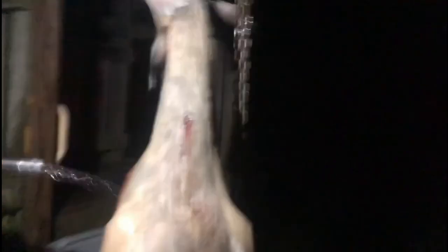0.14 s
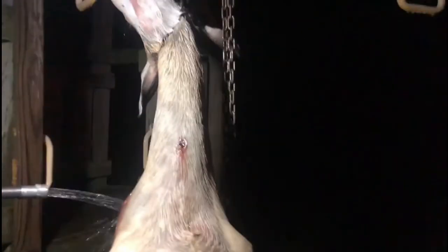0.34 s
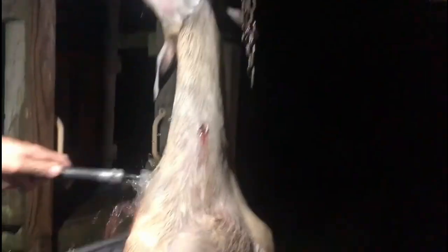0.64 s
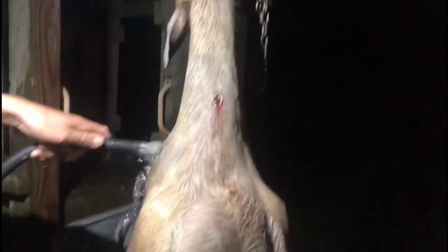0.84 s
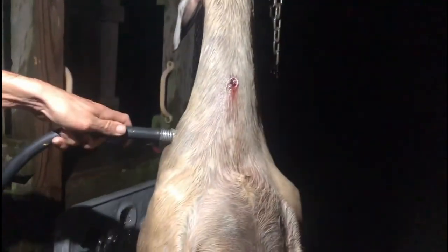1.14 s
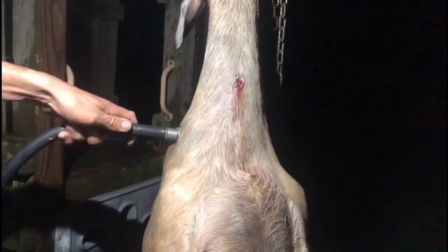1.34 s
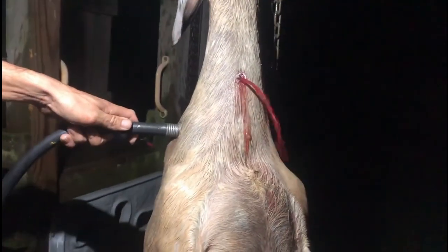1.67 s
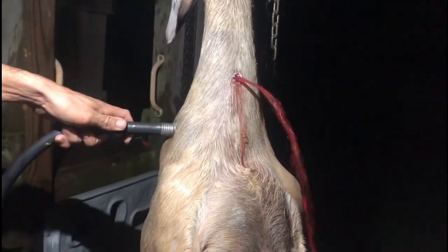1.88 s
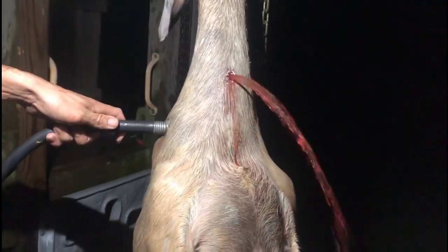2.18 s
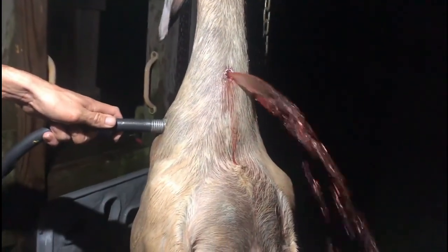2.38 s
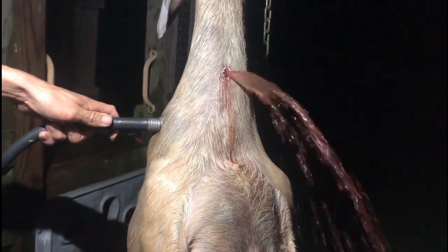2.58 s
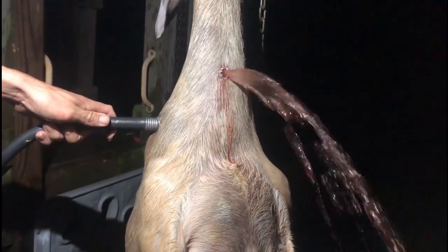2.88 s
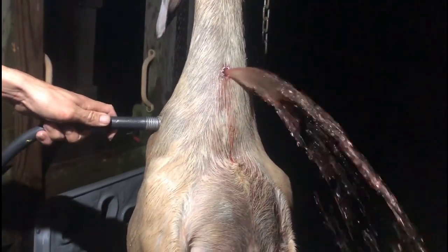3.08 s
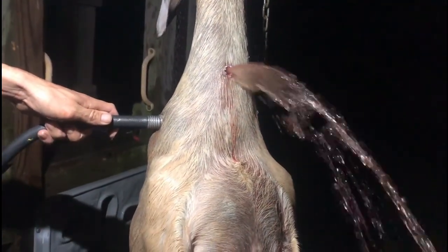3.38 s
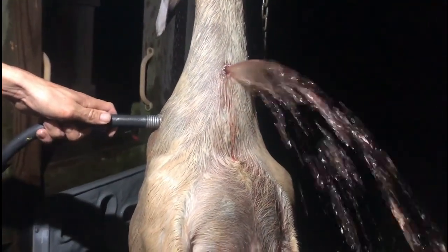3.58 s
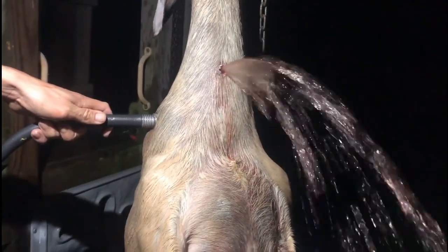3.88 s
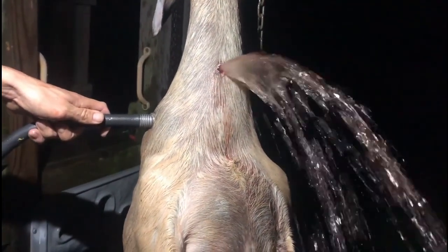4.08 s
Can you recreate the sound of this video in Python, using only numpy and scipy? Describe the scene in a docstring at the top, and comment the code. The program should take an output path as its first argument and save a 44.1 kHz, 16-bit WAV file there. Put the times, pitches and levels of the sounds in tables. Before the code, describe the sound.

Close hose spray splashes on a hanging carcass, gurgles and fades, followed by a thin stream pattering down over constant hiss, left channel only.

```python
"""Hose on a hanging carcass

Outdoors, close to the water: a jet spatters on wet hide as bursts of short damped sines, low and bright.
The nozzle goes in with two clear gulps and a faint echo, swelling low notes, and the splashing dies away.
Then water spills out of a hole and patters on the ground, again as damped sines.
The hose hisses throughout (filtered noise) over a low rumble; only the left channel carries sound."""
import sys
import numpy as np
from scipy import signal
from scipy.fft import rfft, irfft, next_fast_len
from scipy.io import wavfile
from scipy.ndimage import map_coordinates

SR = 44100
rng = np.random.default_rng(int(sys.argv[2]) if len(sys.argv) > 2 else 0)


def store_pcm(level_fs):
    """Save levels as 16-bit WAV."""
    pcm = np.round(np.clip(level_fs, -1, 1) * 32767).astype(np.int16)
    wavfile.write(sys.argv[1], SR, np.atleast_2d(pcm).T)


N = 186177
TIME = np.arange(N) / SR

# All levels in dB are relative settings inside the mix, ahead of the doubling in scene().
# Outdoor rumble, spectrum. Each row: frequency in Hz, level in dB.
RUMBLE_SPECTRUM = [(20, -32), (35, -48), (50, -10), (70, -6.5), (100, -9.5), (150, -18), (300, -35.5)]
# Brief swells of the rumble. Each row: time in seconds, rise in dB.
RUMBLE_SWELLS = [(0.2, 3), (0.37, 6), (0.53, 6), (2.35, 5), (2.51, 12)]
# Water churning inside the body, spectrum. Each row: frequency in Hz, level in dB.
CHURN_SPECTRUM = [(80, -32), (125, -2.5), (165, -0.5), (225, -10), (310, -5), (420, -16), (700, -23.5),
                  (1500, -70)]
# Broad hiss of the hose, spectrum. Each row: frequency in Hz, level in dB.
HISS_SPECTRUM = [(150, -3), (600, -8.5), (1050, 2), (1400, -22), (2200, 3.5), (4000, -0.5), (7000, -1),
                 (11000, -4), (15500, 4.5)]
# Resonances of hose and nozzle. Each row: frequency in Hz, width in Hz, level in dB.
NOZZLE_RESONANCES = [(2190, 41, 6.5), (2833, 144, 0.5), (3627, 45, 3), (4610, 130, -2), (5110, 250, 3)]
# Brief thin whistles. Each row: start in seconds, end in seconds, pitch in Hz, level in dB,
# waver as a share of the pitch.
WHISTLES = [(0.33, 0.85, 4400, -53, 0.028), (2.658, 3.07, 4368, -58.5, 0.008)]
# Air gulped as the nozzle goes in: two gulps and a faint echo.
# Each row: loudest moment in seconds, level in dB, pitch in Hz.
GULPS = [(1.0475, -41, 360), (1.0797, -40.5, 390), (1.093, -55, 370)]
# Single bubbles that ring in the wet. Each row: start in seconds, level in dB, pitch in Hz.
LONE_BUBBLES = [(0.292, -40, 3400), (1.247, -37, 3120), (1.2493, -31.5, 1990), (1.84, -46, 2610),
                (2.192, -49.5, 2830), (2.2993, -38, 4330), (2.896, -36, 9500), (3.0522, -42, 3170),
                (3.1533, -44, 3100), (3.635, -41, 3920), (3.6345, -46, 2840), (3.8157, -43.5, 2620),
                (3.864, -42, 2620), (4.0247, -47, 1540), (4.12, -42.5, 2080)]
# Sputters of fine droplets, beside the nozzle and then on the ground.
# Each row: start in seconds, level in dB, pitch in Hz.
SPURTS = [(0.11, -40, 6450), (0.719, -29.5, 10570), (0.987, -30, 8800), (1.027, -35, 5500),
          (1.071, -47, 12000), (1.094, -36, 8100), (1.129, -37, 7200), (1.136, -31.5, 10900),
          (1.155, -38, 6800), (1.196, -35, 6450), (1.2786, -32, 8150), (1.2965, -35, 8800),
          (1.3169, -32, 8800), (1.3605, -36.5, 5950), (1.4962, -37, 7300), (1.5167, -33.5, 11900),
          (1.5318, -34, 9100), (1.583, -39, 6700), (1.629, -39, 7650), (1.698, -37.5, 5800),
          (1.74, -39.5, 4800), (1.908, -39, 6600), (1.917, -39, 7500), (1.961, -40, 7960),
          (2.019, -39.5, 11000), (2.192, -44, 5170), (2.224, -42, 10000), (2.262, -40, 11200),
          (2.278, -44, 6000), (2.2982, -41.5, 5000), (2.361, -45, 7050), (2.369, -40.5, 8600),
          (2.439, -41, 5300), (2.533, -39.5, 7940), (2.559, -38.5, 7000), (2.6375, -39, 7300),
          (2.6785, -39, 7300), (2.768, -42, 7000), (2.841, -39.5, 5400), (2.9605, -37.5, 6040),
          (2.9812, -43, 7400), (3.004, -40, 6100), (3.049, -39.5, 6570), (3.1523, -39, 5140),
          (3.203, -39.5, 7200), (3.3015, -38.5, 6100), (3.366, -37, 6600), (3.433, -45.5, 6900),
          (3.453, -43, 7100), (3.479, -41, 6560), (3.6175, -38.5, 7500), (3.668, -39.5, 8400),
          (3.724, -38, 13400), (3.831, -38, 5400), (3.843, -39, 8100), (3.863, -33.5, 6400),
          (3.8795, -38, 9300), (3.89, -43, 5550), (3.9, -41.5, 6460), (3.9145, -38, 8400),
          (4.0046, -40, 9000), (4.069, -41, 12000), (4.154, -42, 8300)]
# Soft thuds of water, on the hide and then on the ground.
# Each row: start in seconds, level in dB, pitch in Hz.
THUDS = [(0.049, -34.5, 1360), (0.07, -40, 1150), (0.201, -35.5, 1320), (0.37, -42.5, 1290),
         (0.445, -34, 1560), (0.65, -40.5, 710), (0.828, -38.5, 1310), (1.07, -38.5, 1400),
         (1.103, -40, 1090), (1.386, -40, 1410), (1.475, -44, 1050), (1.693, -47.5, 1120),
         (1.764, -44, 930), (1.868, -53, 734), (2.456, -46.5, 1100), (3.334, -43, 1260), (3.721, -58, 1090),
         (3.914, -57, 1180)]
# The loudest slaps that trap a pocket of air. Each row: start in seconds, level in dB, pitch in Hz.
SLAPS = [(0.0674, -29, 3170), (0.069, -32, 2000), (0.083, -56, 1720), (0.11, -29.5, 2550),
         (0.1144, -36, 2010), (0.116, -29, 3320), (0.1247, -34, 2000), (0.125, -34, 2880),
         (0.159, -29, 3340), (0.199, -37, 2030), (0.2117, -29.5, 2380), (0.213, -45, 1650),
         (0.2479, -30.5, 1780), (0.284, -35, 2070), (0.3372, -42, 1310), (0.3702, -35, 1530),
         (0.381, -35, 1460), (0.394, -32.5, 2600), (0.3957, -30.5, 1900), (0.42, -30.5, 1820),
         (0.4184, -29, 2560), (0.45, -29, 2460), (0.519, -35, 1900), (0.535, -31, 1810),
         (0.606, -39.5, 1530), (0.641, -34, 2500), (0.652, -36, 1610), (0.704, -39, 2100),
         (0.948, -35, 1990), (1.041, -35, 1960), (1.052, -34.5, 2160), (1.07, -33, 2030),
         (1.105, -33, 2070), (1.127, -31, 2200), (1.1623, -35, 1960), (1.169, -33.5, 2450),
         (1.221, -35.5, 2240), (1.2461, -39, 3100), (1.2477, -43, 2110), (1.278, -38, 2050),
         (1.289, -28.5, 2220), (1.3174, -36, 2200), (1.331, -37, 2240), (1.3806, -30.5, 2090),
         (1.391, -34.5, 2220), (1.404, -41, 1920), (1.5173, -34.5, 2940), (1.629, -31, 3300),
         (1.697, -31.5, 3300), (1.712, -41, 2150), (1.84, -41, 2240), (1.7594, -44, 2120),
         (1.768, -37, 1980), (1.863, -37, 1960), (2.2684, -42, 1680), (2.277, -42.5, 1770),
         (2.438, -41, 2590), (2.4555, -37.5, 1570), (2.7315, -38.5, 2300), (2.839, -42, 1680),
         (2.9976, -37.5, 2150), (3.1516, -36.5, 3110), (3.335, -43, 2020), (3.4765, -43.5, 2430),
         (3.5733, -51, 1710), (3.5825, -43, 2200), (3.722, -39, 2200), (3.829, -37.5, 3470),
         (3.8905, -36, 3300), (3.914, -35, 2070), (3.914, -34, 1570)]
# The heaviest drops. Each row: start in seconds, level in dB, pitch in Hz.
HEAVY_DROPS = [(0.109, -31, 6100), (0.134, -21, 7100), (0.3952, -25, 6500), (0.5931, -23.5, 6260),
               (0.683, -20, 6140), (0.6886, -20, 6300), (0.9473, -15.5, 6600), (1.005, -25, 5240),
               (1.037, -29, 5400), (1.0701, -22, 5300), (1.137, -24, 6800), (1.2895, -16.5, 8500),
               (1.3309, -14.5, 7800), (1.5507, -26, 9290), (1.629, -21.5, 7550), (1.79, -33, 11000),
               (1.8775, -20.5, 9600), (1.893, -20, 10600), (2.5206, -27.5, 6400), (2.6513, -21, 7500),
               (2.7385, -21, 7150), (2.895, -31, 9260), (2.9622, -24, 6640), (3.0863, -19, 6170),
               (3.3634, -31, 6300), (3.4532, -29, 7330), (3.5737, -20.5, 8400), (3.6945, -19, 7400),
               (3.7478, -27, 6450), (4.0847, -26, 9500)]
# Fine patter on the ground, spectrum. Each row: frequency in Hz, level in dB.
GROUND_SPECTRUM = [(240, -48), (400, -11.5), (1160, -8.5), (1420, -9.5), (1560, -8), (1790, -5.5),
                   (2220, -0.5), (2840, -35), (3070, -2), (3870, -6.5), (6150, 1), (11400, -4), (15300, 1),
                   (16000, -18)]
# Fine spray on the hide, spectrum. Each row: frequency in Hz, level in dB.
HIDE_SPECTRUM = [(290, -13.5), (500, -14), (795, -25), (974, -20), (1600, -20), (1950, -1), (2500, -3.5),
                 (2730, -6), (3340, -0.5), (4090, -4.5), (7000, -2), (12100, -5.5), (15100, 0),
                 (16000, -20)]

SOUND_ON_S = 0.0478  # silence before this
TOP_HZ = 15950  # band limit
# background: a rumble that swells briefly, and churning that grows as the body fills
RUMBLE_DB, SWELL_WIDTH_S = -65.5, 0.026
CHURN_DB, CHURN_FULL_DB = -67, -62.5
HISS_DB, NOZZLE_DB = -54.0, -61.5
WHISTLE_RISE_S, WHISTLE_FLUTTER_DB = .008, 5
# gulps: the pitch sags as the bubble swells; the rasp is the share of rough sloshing
GULP_WIDTH_S, GULP_SAG_PER_S, GULP_RASP = 0.0036, 39, 0.39
BUBBLE_CYCLES = 5.5  # decay time of a lone bubble in cycles
BUBBLE_GLIDE = 0.0045  # a bubble's rise in pitch over its decay time, as a share
# a slap's pop and splutter against its table level; spread of the splutter's pitches (log units)
POP_DB, SPLUTTER_DB, SPLUTTER_SPREAD = -4.5, -10.5, 0.22
FIZZ_DB, FIZZ_GROWS = -22.5, 0.71  # fragments of a 0 dB drop; dB gained per dB of the drop
# the flow of jet and spill is slightly uneven
SURGE_DB, SURGES_PER_S = -0.07, 8.22
# the overflow starts to land, then grows with the flow
SPILL_S, SPILL_RISE_S = 1.985, 0.33
SPILL_DB, SPILL_GROWS_DB_PER_S = -53.5, 1.34
# slapping, soft low plashing, crisp ticks and ringing bubbles on the ground, against the fine patter
PUDDLE_DB, PLASH_DB, TICK_DB, TINKLE_DB = -13, -19.5, -13.5, -14
# the jet on the hide: steady spray until the nozzle seals, then it dies away and stops
SPRAY_DB, SEAL_S, SPRAY_FADE_DB_PER_S = -44, 1.027, 9
SPRAY_STOP_S = (1.9, 2.06)  # (start, end)
# its slapping weakens once the nozzle starts to close in
SLAP_DB, APPROACH_S, SLAP_FADE_DB_PER_S = -54, 0.68, 12.5
FROTH_DB = -6.5  # bubbles in the film on the hide, against the slapping
# broad splatter of the long jet, against the slapping; (start, end) of its fade as the nozzle closes in
SPLAT_DB, SPLAT_HZ, SPLAT_END_S = -9, 1334, (0.43, 1)
# the half-sealed jet sputters, and gurgles in the pocket around the nozzle
SPUTTER_DB, SPUTTERS_PER_S = 1.9, 53
GURGLE_DB, GURGLE_HZ, GURGLE_FADE_DB_PER_S = -56.5, 2140, 13
GURGLE_RISE_S = (1.1, 1.26)  # (start, end)


def amp(db):
    """Decibels to gain."""
    return 10 ** (np.asarray(db) / 20)


def unit(x):
    """Scale to rms 1."""
    return x / np.sqrt(np.mean(x ** 2) + 1e-20)


def ramp(start, end):
    """Rises from 0 to 1 between two times; a step if they coincide."""
    return np.clip((TIME - start) / max(end - start, 1 / SR), 0, 1)


def since(start):
    """Seconds gone by since a moment, 0 before it."""
    return np.maximum(TIME - start, 0)


def wobble(rate):
    """A smooth random curve, rate knots a second."""
    return map_coordinates(rng.standard_normal(4096), [TIME * rate], mode="wrap")


def filtered(x, response):
    """x times a response of frequency, padded so that its end does not wrap round."""
    m = next_fast_len(N + SR // 2)
    return irfft(rfft(x, m) * response(np.fft.rfftfreq(m, 1 / SR)), m)[..., :N]


def coloured(x, spectrum):
    """x shaped by (Hz, dB) points, at rms 1."""
    f, db = np.transpose(spectrum)
    return unit(filtered(x, lambda hz: amp(np.interp(np.log(hz + 1), np.log(f), db))))


def pings(starts, gains, hz, life, glide=0., size=160):
    """Damped sines laid out in time; life is the decay time in s, glide the rise in pitch per life."""
    t = np.arange(size) / SR
    age = t / life[:, None]
    shape = np.exp(-age) * (1 - np.exp(-5 * age)) / .58  # soft onset, peak near 1
    cycles = hz[:, None] * t * (1 + glide * age / 2)
    waves = gains[:, None] * shape * np.sin(2 * np.pi * cycles)
    where = (starts * SR).astype(int)[:, None] + np.arange(size)
    return np.bincount(where.ravel(), waves.ravel(), N)[:N]


def sizes(starts, size_db, clump_db):
    """Gains for many small drops and a few large ones, louder in clumps as the stream breaks up."""
    large = np.minimum(rng.exponential(size=len(starts)), 3)
    clumps = unit(np.gradient(wobble(110)))
    return amp(size_db * large + clump_db * np.interp(starts, TIME, clumps))


def fragments(starts, gains, hz, scatter, spread, count):
    """Each drop breaks into pieces near its own pitch, weaker the later they land: (starts, gains, Hz)."""
    z = rng.standard_normal((len(starts), 3, count))
    late = (np.arange(count) + .5 + .5 * np.tanh(z[:, 0])) / count  # 0 to 1 over the scatter time
    pieces = gains[:, None] * np.sign(z[:, 1]) * np.exp(-2 * late)
    pitch = np.minimum(hz[:, None] * np.exp(spread * z[:, 2]), SR / 2)
    return (starts[:, None] + scatter * late).ravel(), pieces.ravel(), pitch.ravel()


def spray(spectrum, size_db, clump_db, scatter, count):
    """Droplets of all pitches, each a brief burst of ticks."""
    when, pitch = rng.random((2, count))
    starts = when * TIME[-1]
    drop_gains = sizes(starts, size_db, clump_db)
    drop_hz = SR / 2 * (.01 + .8 * pitch)
    s, gains, hz = fragments(starts, drop_gains, drop_hz, scatter, spread=.2, count=8)
    life = .00008 * 4 ** rng.random(len(s))
    return coloured(pings(s, gains, hz, life, size=56), spectrum)


def slapping(pitch_hz, spread, size_db, count):
    """Blobs of water trap clusters of small air pockets that ring for a few cycles."""
    starts = rng.random(count) * TIME[-1]
    pitch = np.interp(starts, TIME, pitch_hz) * np.exp(spread * rng.standard_normal(count))
    blob_gains = sizes(starts, size_db, clump_db=4.0)
    s, gains, hz = fragments(starts, blob_gains, pitch, scatter=.008, spread=0.06, count=4)
    return unit(pings(s, gains * np.sqrt(hz), hz, 1.13 / hz, size=300))


def bubbling(pitch_hz, spread, cycles, count):
    """A swarm of single bubbles, each ringing at its own pitch."""
    starts = rng.random(count) * TIME[-1]
    hz = pitch_hz * np.exp(spread * rng.standard_normal(count))
    gains = sizes(starts, size_db=6.5, clump_db=2.0)
    return unit(pings(starts, gains, hz, cycles / hz, glide=BUBBLE_GLIDE, size=600))


def ticking(pitch_hz, spread, cycles, range_db, count):
    """Lone droplets land, each one dry tick at its own pitch."""
    when, size = rng.random((2, count))
    hz = np.minimum(pitch_hz * np.exp(spread * rng.standard_normal(count)), SR / 3)
    return unit(pings(when * TIME[-1], amp(range_db * size), hz, cycles / hz))


def rumble():
    """Outdoor rumble: low filtered noise with a few brief swells."""
    swell_db = sum(db * np.exp(-((TIME - s) / SWELL_WIDTH_S) ** 2) for s, db in RUMBLE_SWELLS)
    return amp(RUMBLE_DB + swell_db) * coloured(rng.standard_normal(N), RUMBLE_SPECTRUM)


def churn():
    """Water churns as the body fills: low filtered noise that grows from the start of the spill."""
    churn_db = CHURN_DB + (CHURN_FULL_DB - CHURN_DB) * ramp(SPILL_S, TIME[-1])
    return amp(churn_db) * coloured(rng.standard_normal(N), CHURN_SPECTRUM)


def shed(x, t60):
    """A short scatter off the timber and the ground nearby: decaying noise after a 3 ms gap."""
    t = np.arange(SR // 4) / SR
    tail = rng.standard_normal(len(t)) * amp(-60 * t / t60) * (t > .003)
    return signal.fftconvolve(x, tail / np.linalg.norm(tail))[:N]


def hose():
    """Water hisses through the nozzle: broad noise, and noise through parallel band-pass resonances."""
    def body(f):
        return sum(amp(db) * 1j * f * w / (c * c - f * f + 1j * f * w) for c, w, db in NOZZLE_RESONANCES)

    hiss = amp(HISS_DB) * coloured(rng.standard_normal(N), HISS_SPECTRUM)
    return hiss + amp(NOZZLE_DB) * unit(filtered(rng.standard_normal(N), body))


def whistles():
    """A thin high note starts at once and fades: airy the first time, nearly pure the second."""
    out = np.zeros(N)
    for start, end, hz, db, waver in WHISTLES:
        phase = 2 * np.pi * np.cumsum(hz * (1 + waver * wobble(300))) / SR
        swell = ramp(start, start + WHISTLE_RISE_S) * (1 - ramp(start, end))
        out += amp(db + WHISTLE_FLUTTER_DB * wobble(40)) * swell * np.sin(phase)
    return out


def blips():
    """Lone bubbles ring with a nearly pure note that rises slightly."""
    s, db, hz = np.transpose(LONE_BUBBLES)
    return pings(s, amp(db), hz, BUBBLE_CYCLES / hz, glide=BUBBLE_GLIDE, size=1200)


def spurts():
    """Short sputters: a puff of fine droplets with no single crack."""
    s, db, hz = np.transpose(SPURTS)
    when, gains, pitch = fragments(s, amp(db), hz, scatter=0.005, spread=0.15, count=60)
    return pings(when, gains, pitch, 1.1 / pitch)


def thuds():
    """Thick blobs land dully and hardly ring."""
    s, db, hz = np.transpose(THUDS)
    when, gains, pitch = fragments(s, amp(db), hz, scatter=0.01007, spread=0.12, count=8)
    return pings(when, gains, pitch, 1.1 / pitch, size=600)


def gulps():
    """Big bubbles swell and collapse within a few cycles as the nozzle enters, sagging and sloshing."""
    slosh = coloured(rng.standard_normal(N), [(120, -22), (250, 4), (520, -4), (800, -29)])
    out = np.zeros(N)
    for s, db, hz in GULPS:
        t = TIME - s
        note = np.sin(2 * np.pi * hz * t * (1 - GULP_SAG_PER_S * t / 2))
        tone = np.exp(-(t / GULP_WIDTH_S) ** 2) * note
        rasp = np.exp(-(t / GULP_WIDTH_S / 2) ** 2) * slosh / 2  # half as long as the note
        out += amp(db) * (tone + GULP_RASP * rasp)
    return out


def big_slaps():
    """Larger air pockets pop under the water, each with a splutter of smaller ones."""
    s, db, hz = np.transpose(SLAPS)
    pops = pings(s + 0.00096, amp(db + POP_DB), hz, 3.8 / hz, glide=0.0018, size=1000)
    when, gains, pitch = fragments(s + 0.001005, amp(db + SPLUTTER_DB), hz, scatter=0.008,
                                   spread=SPLUTTER_SPREAD, count=20)
    return pops + pings(when, gains, pitch, 1.9 / pitch, size=600)


def big_drops():
    """Single heavy drops crack, a low tick and a bright one together, and their fragments fizz."""
    s, db, hz = np.transpose(HEAVY_DROPS)
    low_ticks = pings(s + .0012, amp(db - 3), hz, 1.2 / hz)
    bright_ticks = pings(s + .0013, amp(db - 5.5), hz / 2 + 9000, .9 / hz)
    fizz_gains = amp(FIZZ_DB + FIZZ_GROWS * db)
    when, gains, pitch = fragments(s + .0008, fizz_gains, hz, scatter=0.0045, spread=0.14, count=44)
    return low_ticks + bright_ticks + pings(when, gains, pitch, .8 / pitch)


def spill():
    """The overflow falls to the ground and breaks into drops, louder as the stream thickens."""
    flow_db = SPILL_DB + SPILL_GROWS_DB_PER_S * since(SPILL_S) + SURGE_DB * wobble(SURGES_PER_S)
    fine = spray(GROUND_SPECTRUM, size_db=3.0, clump_db=1.7, scatter=.0025, count=3600)
    wet = amp(PUDDLE_DB) * slapping(np.full(N, 2800), spread=0.32, size_db=1.5, count=600)
    plash = amp(PLASH_DB) * slapping(np.full(N, 1000), spread=0.38, size_db=1.0, count=300)
    ticks = amp(TICK_DB) * ticking(4300, spread=0.44, cycles=1.9, range_db=3, count=330)
    tinkle = amp(TINKLE_DB) * bubbling(4780, spread=0.39, cycles=14.0, count=500)
    patter = fine + wet + plash + tinkle + ticks
    return amp(flow_db) * patter * ramp(SPILL_S, SPILL_S + SPILL_RISE_S)


def jet():
    """The jet spatters on the hide until the nozzle is buried; the air pockets shrink as it closes in."""
    spray_db = SPRAY_DB - SPRAY_FADE_DB_PER_S * since(SEAL_S) + SURGE_DB * wobble(SURGES_PER_S)
    sputter = unit(amp(SPUTTER_DB * ramp(*GURGLE_RISE_S) * np.tanh(wobble(SPUTTERS_PER_S))))
    fine = spray(HIDE_SPECTRUM, size_db=2.5, clump_db=2.18, scatter=.0042, count=7000)
    slap_db = SLAP_DB - SLAP_FADE_DB_PER_S * since(APPROACH_S)
    pocket_hz = 1900 + 500 * ramp(APPROACH_S, APPROACH_S)  # smaller pockets ring higher: one step up
    slaps = slapping(pocket_hz, spread=0.22, size_db=0.5, count=2400)
    froth = amp(FROTH_DB) * bubbling(1800, spread=0.258, cycles=3.7, count=2200)
    splat = amp(SPLAT_DB) * bubbling(SPLAT_HZ, spread=0.13, cycles=2.3, count=1100)
    splat *= 1 - ramp(*SPLAT_END_S)
    gurgle_db = GURGLE_DB - GURGLE_FADE_DB_PER_S * since(SEAL_S)
    gurgle = amp(gurgle_db) * bubbling(GURGLE_HZ, spread=0.17, cycles=3.4, count=1300)
    gurgle *= ramp(*GURGLE_RISE_S)
    spatter = amp(spray_db) * sputter * fine + amp(slap_db) * (slaps + froth + splat) + gurgle
    return spatter * (1 - ramp(*SPRAY_STOP_S))


def scene():
    """All the water, close by, on the left channel alone."""
    # drops, sputters, slaps and lone bubbles carry almost no bass
    drops = big_drops() + spurts() + big_slaps() + blips()
    drops = filtered(drops, lambda hz: hz ** 2 / (hz ** 2 + 550 ** 2))
    water = jet() + spill() + drops + thuds() + gulps()
    scatter = amp(-13.5) * shed(water, t60=0.041)
    sound = water + scatter + hose() + whistles() + rumble() + churn()
    sound *= ramp(SOUND_ON_S, SOUND_ON_S + 0.002)
    return np.array([2 * sound, np.zeros(N)])


def record(dry):
    """The microphone channel passes nothing above its band limit."""
    return filtered(dry, lambda hz: hz < TOP_HZ)


dry = scene()
out = record(dry)
store_pcm(out)
```